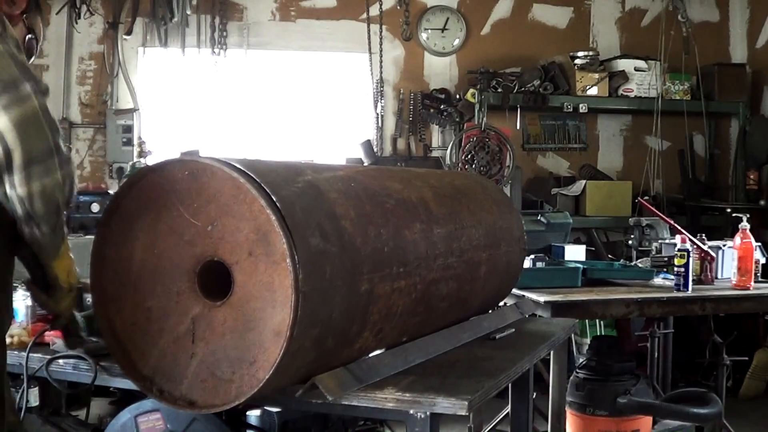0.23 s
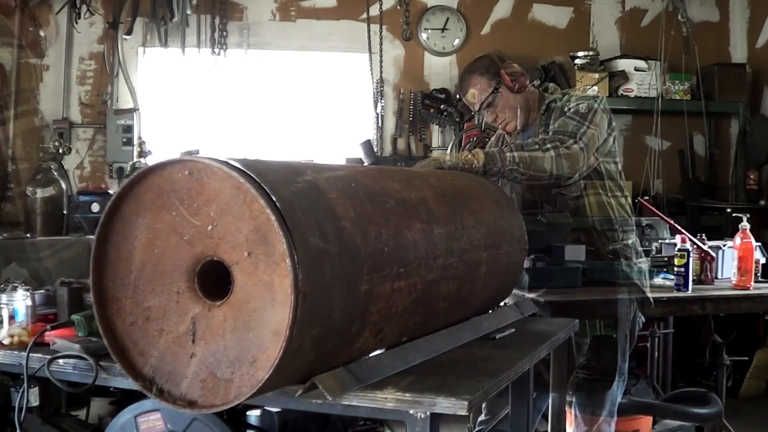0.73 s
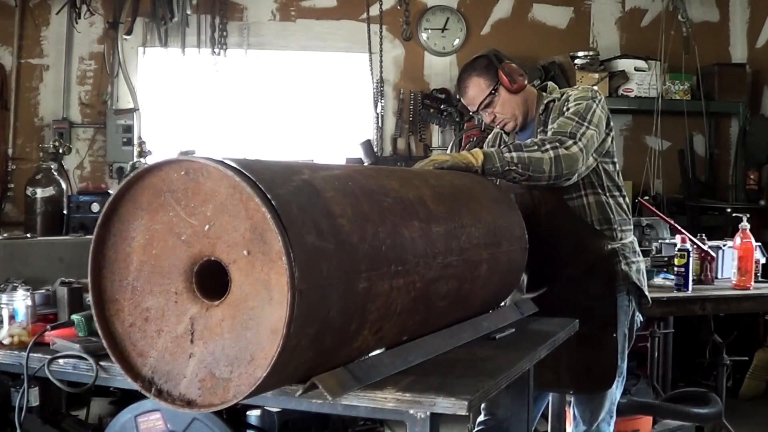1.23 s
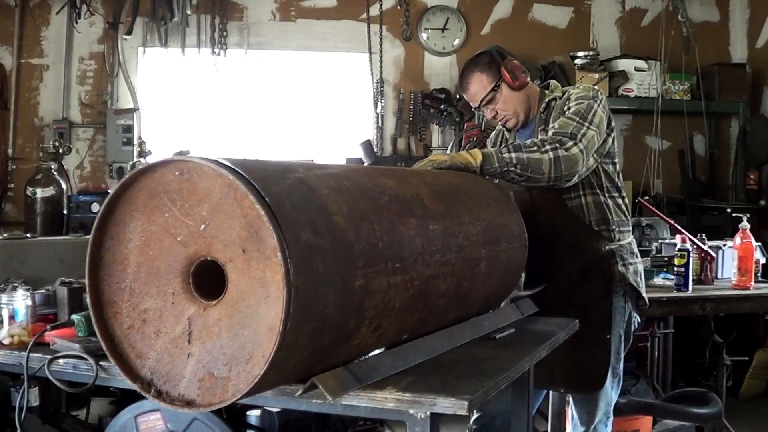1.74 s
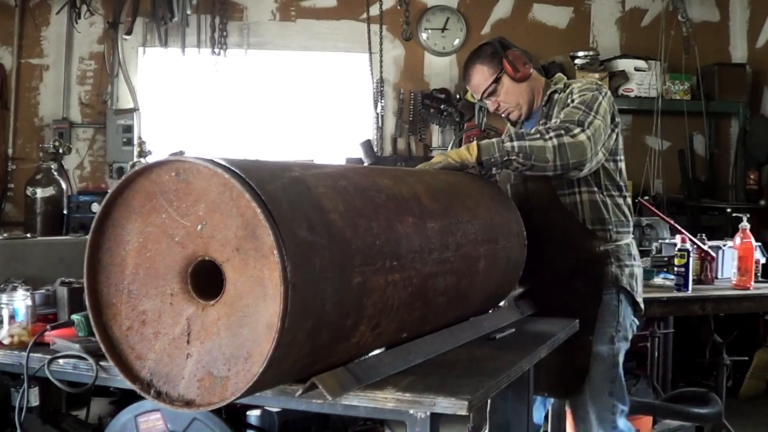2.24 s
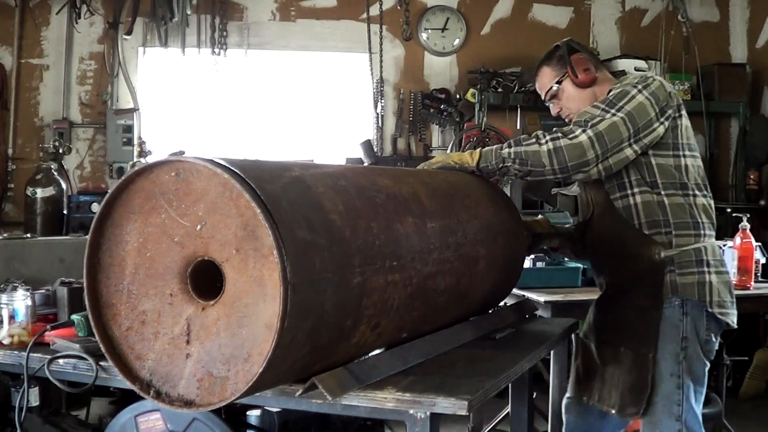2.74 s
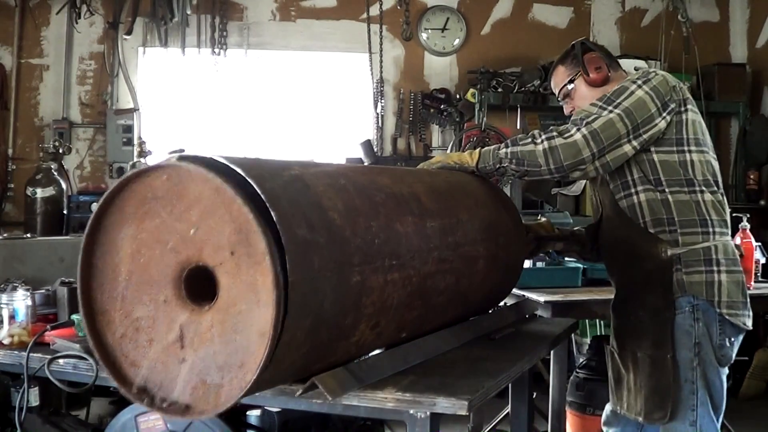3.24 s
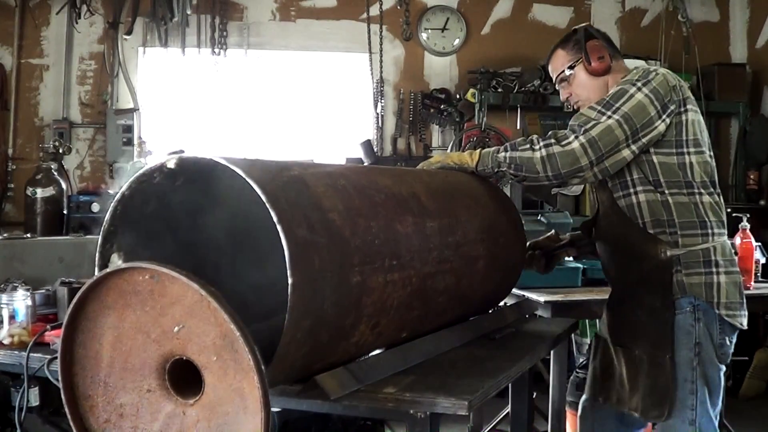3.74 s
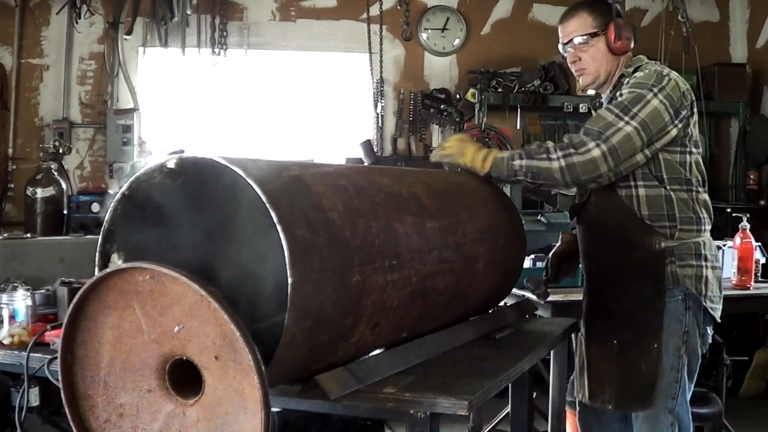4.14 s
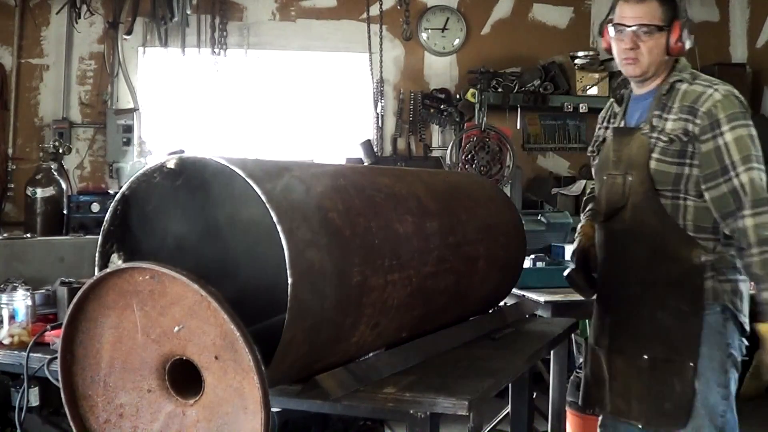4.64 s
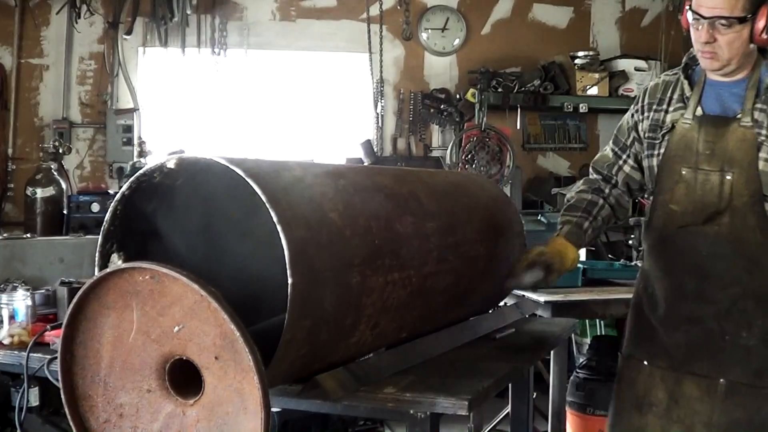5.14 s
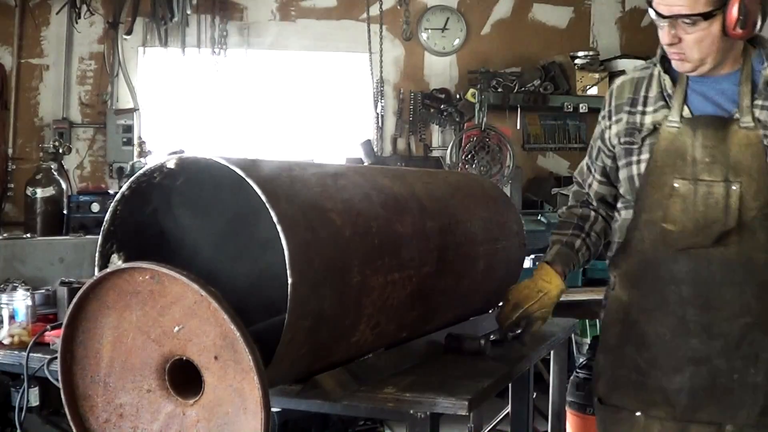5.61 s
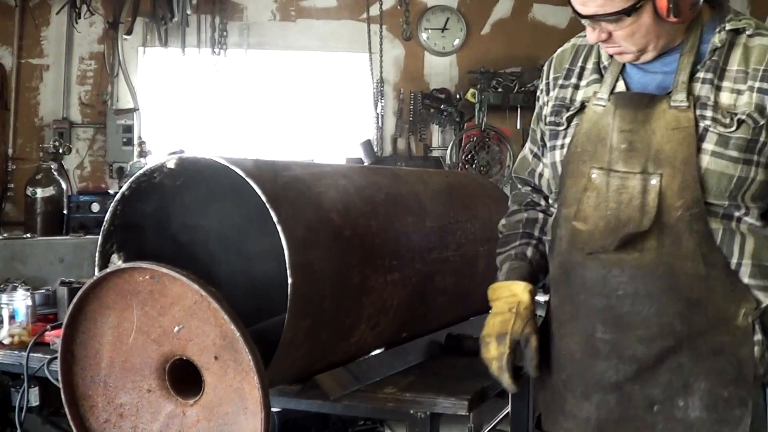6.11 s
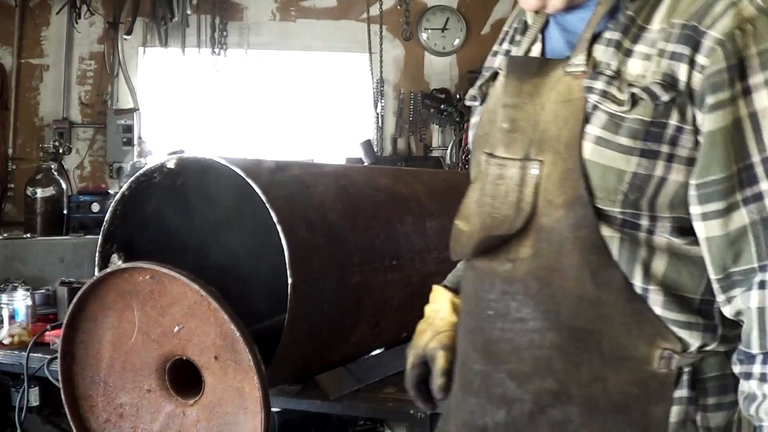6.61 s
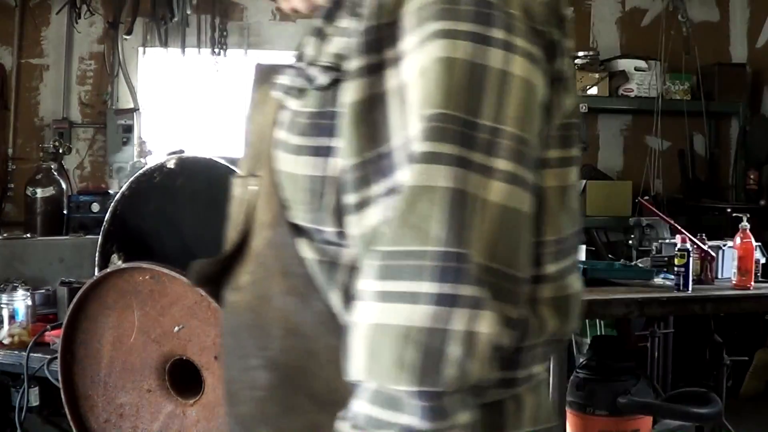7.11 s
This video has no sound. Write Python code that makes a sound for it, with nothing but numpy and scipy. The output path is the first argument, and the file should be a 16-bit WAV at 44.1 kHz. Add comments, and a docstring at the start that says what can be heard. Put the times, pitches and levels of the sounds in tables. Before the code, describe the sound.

A small garage workshop, closely heard in stereo, with soft airy room noise, low hum and a barely audible high whine. Faint clangs and dull bumps occupy the first 0.7 seconds. At 0.75, 1.25 and 1.7 a bar strikes a hollow steel tank: loud, booming, dense clangs with short reverberant tails and a thin singing after-ring, peaks flattened. Around 2.0-2.7 come small metal ticks and glove rustle. At 2.73 the lid takes a choppy, held blow; at 3.23 a far louder one rings it like a gong near 740 Hz. Freed, it grinds harshly down the rim around 3.35-3.65 with clashes, its ring quickly damped, a slight tick at 3.9. Quiet cloth movement follows. At 5.26 a heavy tool clanks onto a steel bench, bouncing at 5.36 and 5.43. The ring dies; faint ticks, clothing rustle and low tread lead to gritty sole crackles at 7.0-7.2.

```python
"""Faint clangs, then three booming blows of a bar on the cut end of a steel tank, in a small garage workshop.
Two blows ring the lid, which breaks free and grinds down the rim; a heavy tool lands on the steel bench.
The worker shuffles past over grit, amid workshop air and hum. Struck steel is decaying sine modes plus
clustered noise, scraping is random slips ringing the steel, cloth and air are shaped noise.
A limiter flattens the loud peaks."""
import sys
import numpy as np
from scipy import signal
from scipy.fft import rfft, irfft, next_fast_len
from scipy.io import wavfile
from scipy.ndimage import uniform_filter1d, minimum_filter1d

SR = 44100
rng = np.random.default_rng(int(sys.argv[2]) if len(sys.argv) > 2 else 0)


def master(y):
    """Save y as 16-bit WAV."""
    cut = np.clip(np.atleast_2d(y).T, -1, 1)
    pcm = np.round(cut * 32767)  # scale
    wavfile.write(sys.argv[1], SR, pcm.astype(np.int16))


N = 324576

# Blows on the shell. Each row: start in seconds, clang level in dB, bass gain in dB, treble gain in dB,
# gain of the modes in dB, place from 0 (rim) to 1 (further in).
TANK_BLOWS = [(0.0, -28.5, 5, -21, -46.5, 0.53), (0.591, -33.5, -20.5, 3.5, -49.5, 0),
              (.618, -35, 11.5, 0, -56.5, .2), (0.73, -38, 19.5, -15.5, -44.5, 0.12),
              (.75, -7, 8.5, 11, -11.5, 0), (1.249, -0.5, 3.5, 5, -7.5, 0.0011),
              (1.691, -5.5, 8.5, 17, -3, 0.84)]
# Colour of the shell's unresolved modes. Each row: frequency in Hz, relative density in dB.
TANK_CLANG = [(40, -37), (170, -3.5), (320, -1.5), (700, -5.5), (990, -2.5), (1300, -5), (1850, -4),
              (3060, -10), (4240, -16), (5400, -12), (7730, -20), (10200, -13), (12500, -24.5),
              (16000, -30)]


def tank(sustain=0.88, mode_sustain=0.79):
    """The bar strikes the shell: a dense clang plus its distinct modes."""
    out = np.zeros((2, N))
    for s, db, bass_db, treble_db, modes_db, place in TANK_BLOWS:
        crowd = shelves(clang(TANK_CLANG, sustain), bass_db, treble_db)
        modes = ring(shell_modes(place, modes_db, mode_sustain), flutter=0.5, flutter_per_s=31)
        add(out, s, contact(from_db(db) * crowd))
        add(out, s, contact(modes))
    return out


# Tank shell modes. Each row: frequency in Hz, relative level in dB struck at the rim,
# relative level in dB struck further in.
TANK_MODES = [(184, -5, -10), (330, -2, -11), (495, -10, -8), (968, -10, -11), (1012, -3, -4),
              (1058, -7, -5), (1385, -8, -10), (1464, -7, 2), (1669, -3, -5), (1830, -1, -12),
              (1866, -4, -5), (2019, -6, -7), (2200, -8, -19), (2461, 1, -8), (2676, -7, -5),
              (2987, -4.5, -3), (3168, -8, -13), (3225, -22, -5), (3430, -7, -10), (3510, -19, -6),
              (3887, -16, -9), (4064, -20, -11), (4923, -14, -16), (5195, -25, -9), (5367, -15, -10),
              (5717, -6, -10), (5798, -22, -7)]


def shell_modes(place, db, sustain):
    """The shell's modes die the faster the higher they lie."""
    modes = [(hz, rim, inner, sustain * at_hz(RING_T60_S, hz)) for hz, rim, inner in TANK_MODES]
    return blend(modes, place, db)


# Bar and shell singing on. Each row: frequency in Hz, level in dB re the blow's clang level, t60 in seconds.
BAR_MODES = [(1012, -17, 1.1), (2730, -30, 1.4)]


def bar():
    """The thin after-ring of sine modes that each blow of the bar on the shell leaves."""
    out = np.zeros((2, N))
    for s, db, *_ in TANK_BLOWS:
        add(out, s, from_db(db) * ring(BAR_MODES, flutter=0.43, flutter_per_s=17))
    return out


# Blows on the lid. Each row: start in seconds, clang level in dB, bass gain in dB, treble gain in dB,
# gain of the modes in dB, freedom from 0 (held) to 1 (free).
LID_BLOWS = [(2.731, -4, 3.5, 3.5, -3.5, 0.04), (3.228, 6.5, -6, 9, 17.5, 0.78)]
# Lid modes. Each row: frequency in Hz, relative level in dB held at the rim,
# relative level in dB hanging free, t60 in seconds.
LID_MODES = [(453, -20, -49, 0.6), (603, -23, -29, 0.5), (738, -34, -3, 0.95), (743, -3, -32, 0.58),
             (776, -19, -33, 0.6), (974, -18, -44, 0.7), (1305, -22, -50, 0.6), (1389, -26, -18, 0.35),
             (1647, -43, -17, 0.4), (1809, -35, -18, 0.25), (1922, -18, -12, 0.29), (2078, -38, -9.5, 0.32),
             (2170, -19, -28, 0.5), (2433, -36, -24, 0.425), (2988, -20, -37, 0.5), (3150, -29, -31, 0.4),
             (3747, -30, -31, 0.34), (6002, -29, -57, 0.425), (742, -58, -42, 4.0), (746, -60, -44, 4.0)]
# Colour of the lid's unresolved modes. Each row: frequency in Hz, relative density in dB.
LID_CLANG = [(100, -42.5), (145, -14), (556, -7.5), (751, -1.5), (831, -12.5), (990, -5.5), (1180, -18.5),
             (2210, -10), (2840, -21.5), (5870, -26), (10000, -32.5), (16000, -45)]
# The rim damps the lid as it slides down. Each row: time in seconds, gain of the modes in dB.
LID_GAIN_DB = [(3.39, 5.5), (3.52, -4.5), (3.9, -17)]


def lid(sustain=0.88):
    """The lid rings like a gong: choppy while held at the rim, purer once free, until it rubs."""
    out, gong = np.zeros((2, 2, N))
    for s, db, bass_db, treble_db, modes_db, freedom in LID_BLOWS:
        held = 1 - np.clip(freedom, 0, 1)
        crowd = shelves(clang(LID_CLANG, sustain * np.sqrt(held)), bass_db, treble_db)
        modes = ring(blend(LID_MODES, freedom, modes_db), flutter=0.36 * np.sqrt(held), flutter_per_s=30)
        add(out, s, contact(from_db(db) * crowd))
        add(gong, s, contact(modes))
    return out + gong * from_db(in_time(LID_GAIN_DB)[0])


# The freed lid grinds down the rim. Each row: peak in seconds, level in dB, swell in seconds, treble gain in dB.
SLIDES = [(3.44, -9.5, 0.19, 2.5), (3.495, -17.5, 0.037, -11), (3.815, -42.5, 0.097, 5)]
# Colour of the dragged or clashing lid. Each row: frequency in Hz, relative density in dB.
SCRAPE_COLOUR = [(40, -37.5), (150, -24), (312, -15), (585, -18), (751, -11), (1120, -14), (1410, -10.5),
                 (2900, -12), (4300, -18.5), (5870, -12), (7730, -23.5), (10300, -15), (16000, -40)]
SLIDE_FADE_DB_PER_S = 121.5


def scrape(size=14000):
    """Once free, the lid drags over the shell and wakes its modes."""
    steel = clang(SCRAPE_COLOUR, sustain=0.2, size=size)
    modes = ring(shell_modes(place=0.64, db=-15.0, sustain=0.26), flutter=0.9, flutter_per_s=48)
    add(steel, 0, modes[:, :size])
    free = np.arange(N) / SR > LID_BLOWS[-1][0]
    return free * friction(SLIDES, steel, slips_per_s=600, spread_db=4.5)


def friction(slides, body, slips_per_s, spread_db):
    """Tiny slips of uneven size, each ringing the body briefly."""
    db, treble_db = strokes(slides, SLIDE_FADE_DB_PER_S)
    signs = rng.choice([-1, 1], N)
    sizes = from_db(spread_db * np.minimum(rng.exponential(1, N), 4)) * signs
    slips = sizes * (rng.random(N) < slips_per_s / SR)
    force = from_db(db) * slips / slips.std()
    response = body / np.sqrt(np.sum(body ** 2) / 2)
    rubbed = signal.fftconvolve(force[None], response, axes=1)[:, :N]
    return shelves(rubbed, 0, treble_db)


# The falling lid clashes on the rim. Each row: start in seconds, level in dB, treble gain in dB.
LID_KNOCKS = [(3.344, -13.5, 1), (3.553, -16, 4), (3.648, -22.5, -3.5)]


def lid_knocks(sustain=0.75):
    """On its way down the lid catches on the rim, each clash a burst of crowded modes."""
    out = np.zeros((2, N))
    for s, db, treble_db in LID_KNOCKS:
        add(out, s, from_db(db) * shelves(clang(SCRAPE_COLOUR, sustain), 0, treble_db))
    return out


# The tool lands and bounces. Each row: start in seconds, clang level in dB, bass gain in dB,
# treble gain in dB, gain of the modes in dB.
BENCH_BLOWS = [(5.26, 4.5, -19.5, -9, -21), (5.266, -2.5, 2.5, 2.5, -5.5), (5.276, -6.5, 6, -6, -24.5),
               (5.357, -14.5, 4.5, -4.5, -16.5), (5.428, -13, 10, 6, -19.5)]
# Bench, and the tank that lies on it. Each row: frequency in Hz, relative level in dB, t60 in seconds.
BENCH_MODES = [(190, -10.5, 0.91), (330, -0.5, 0.72), (445, -6.5, 0.81), (733, 8.5, 0.34), (957, -9, 0.54),
               (623, -7, 0.5), (363, -42, 2.9), (760, -38.5, 3)]
# Colour of the bench's unresolved modes. Each row: frequency in Hz, relative density in dB.
BENCH_CLANG = [(40, -46), (100, -38.5), (165, -10.5), (320, -3), (730, -3), (1020, -7.5), (2320, -16.5),
               (4340, -28), (7500, -30.5), (9690, -30), (16000, -51)]


def bench(sustain=0.82):
    """A heavy tool lands on the steel bench and bounces, ringing the same modes each time."""
    out = np.zeros((2, N))
    modes = ring(BENCH_MODES, flutter=0.38, flutter_per_s=25)
    for s, db, bass_db, treble_db, modes_db in BENCH_BLOWS:
        crowd = shelves(clang(BENCH_CLANG, sustain), bass_db, treble_db)
        add(out, s, contact(from_db(db) * crowd, rise_s=0.0018))
        add(out, s, contact(from_db(modes_db) * modes))
    return out


# Dull bumps and footfalls. Each row: start in seconds, level in dB.
BUMPS = [(0.211, -33), (0.454, -39.5), (0.599, -29.5), (.948, -21), (1.157, -27.5), (1.48, -20.5),
         (2.366, -49), (6.949, -45.5)]
# Colour of a bump. Each row: frequency in Hz, relative density in dB.
BUMP_COLOUR = [(50, -18.5), (150, -5), (380, 4), (700, -7.5), (1500, -20.5), (6000, -55)]
# Small metal ticks. Each row: start in seconds, level in dB, treble gain in dB.
TICKS = [(.378, -47, 6), (2.089, -29, 0), (2.177, -35, 0), (2.322, -33, 0), (3.89, -32, 5), (5.266, -3, -8),
         (5.656, -44, 3), (6.503, -43, 0)]
# Colour of a tick. Each row: frequency in Hz, relative density in dB.
TICK_COLOUR = [(500, -16), (2000, -39), (5500, 17.5), (10000, 15.5), (16000, 3)]


def small_knocks(bump_sustain=0.35, tick_sustain=0.03, room_sustain=0.65, room_db=-15):
    """Dull bumps, and sharp ticks with a quieter trail of room."""
    out = np.zeros((2, N))
    for s, db in BUMPS:
        bump = clang(BUMP_COLOUR, bump_sustain, size=12000)
        add(out, s, contact(from_db(db) * bump, rise_s=0.0034))
    for s, db, treble_db in TICKS:
        tick = clang(TICK_COLOUR, tick_sustain, size=12000)
        room = from_db(room_db) * clang(TICK_COLOUR, room_sustain, size=12000)
        add(out, s, from_db(db) * shelves(tick + room, 0, treble_db))
    return out


# Cracks under the worker's soles. Each row: start in seconds, level in dB.
GRIT_CRACKS = [(6.984, -39), (7.005, -31), (7.018, -37), (7.034, -36), (7.044, -36), (7.062, -30),
               (7.17, -32), (7.176, -29)]
# Colour of a crack. Each row: frequency in Hz, relative density in dB.
GRIT_COLOUR = [(900, -21), (1900, 4.5), (4400, -10.5), (6500, -2), (16000, -17)]


def grit(crack_s=0.0013, room_db=-17):
    """Grains crack under a sole: each a dry snap with a faint trail of room."""
    out = np.zeros((2, N))
    for s, db in GRIT_CRACKS:
        trail = clang(GRIT_COLOUR, sustain=0.84)
        t = np.arange(trail.shape[1]) / SR
        snap = noise(GRIT_COLOUR, len(t)) * np.exp(-t / crack_s)
        add(out, s, from_db(db) * (snap + from_db(room_db) * trail))
    return out


# Gloves, apron and soles. Each row: peak in seconds, level in dB, swell in seconds, treble gain in dB.
BRUSHES = [(.5, -52, 0.2, -0.5), (2.04, -38, 0.025, 0.5), (2.418, -37, 0.094, 1), (2.725, -33.5, 0.13, 2),
           (4.115, -49, 0.11, -0.5), (4.86, -52, 0.16, -2.5), (6.335, -49, 0.047, 7.5),
           (6.495, -46, 0.18, -8), (7.03, -43, 0.18, -14), (7.19, -42.5, 0.085, -3)]
# Colour of the rustle. Each row: frequency in Hz, relative density in dB.
CLOTH_COLOUR = [(300, -17.5), (900, -9), (2000, -5.5), (4000, -11.5), (9000, -10.5), (16000, -16.5)]
BRUSH_FADE_DB_PER_S = 100


def shuffle(crinkle_db=2.0, crinkles_per_s=160):
    """Gloves, apron and soles rustle in quick uneven catches: noise of wandering level."""
    db, treble_db = strokes(BRUSHES, BRUSH_FADE_DB_PER_S)
    catches_db = crinkle_db * wander(np.arange(N) / SR, crinkles_per_s)
    return shelves(from_db(db + catches_db) * noise(CLOTH_COLOUR, N), 0, treble_db)


# The floor shakes under the worker's tread. Each row: time in seconds, level in dB.
TREAD_DB = [(6.2, -62), (6.45, -59), (6.7, -56), (6.9, -62), (7.3, -59)]
# Colour of the floor. Each row: frequency in Hz, relative density in dB.
FLOOR_COLOUR = [(25, -19.5), (65, 2.5), (140, -6), (400, -40.5)]


def tread():
    """The floor shakes underfoot: low noise that swells and ebbs."""
    return from_db(in_time(TREAD_DB)[0]) * noise(FLOOR_COLOUR, N)


# Colour of the air. Each row: frequency in Hz, relative density in dB.
AIR_COLOUR = [(25, -19.5), (80, -5), (190, -0.5), (400, -6.5), (750, -6.5), (1160, -14.5), (2160, -15),
              (4370, -22.5), (15000, -25)]
# Level of the air. Each row: time in seconds, level in dB.
AIR_DB = [(0, -49.5), (2.3, -46.5), (3.1, -53), (4.3, -56.5), (5.2, -54.5), (6.0, -53.5), (7.36, -51.5)]
# Steady tones. Each row: frequency in Hz, rms level in dB.
TONES = [(183, -64), (360.5, -65.5), (15735, -72)]


def background():
    """Workshop air as shaped noise, a low hum and a thin electronic whine as sines."""
    t = np.arange(N) / SR
    air = from_db(in_time(AIR_DB)[0]) * noise(AIR_COLOUR, N)
    tones = np.zeros(N)
    for hz, rms_db in TONES:
        tones += np.sqrt(2) * from_db(rms_db) * np.sin(2 * np.pi * (hz * t + rng.random()))
    return air + tones


# One random pattern of strong and weak mode clusters, shared by every clang.
CLUSTER_PATTERN = rng.standard_normal(SR // 2)
# Decay of steel and room together. Each row: frequency in Hz, t60 in seconds at sustain 1.
RING_T60_S = [(60, 0.9), (250, 0.68), (700, 0.67), (2000, 0.64), (5000, 0.55), (10000, 0.37), (13000, 0.32),
              (16000, .24)]
FRAME = 256  # samples


def clang(spectrum, sustain, size=36864, ripple_db=3.6, cluster_hz=20, even_below_hz=500):
    """Countless close modes and room echoes: noise crowded into narrow clusters, the high bands dying first."""
    hz = np.fft.rfftfreq(size, 1 / SR)
    centres = np.arange(0, SR / 2, cluster_hz)
    pattern = np.interp(hz, centres, CLUSTER_PATTERN[:len(centres)])
    clusters = from_db(ripple_db * hz / (hz + even_below_hz) * pattern)
    crowd = irfft(rfft(noise(spectrum, size)) * clusters, size)
    hz, t, frames = signal.stft(crowd / crowd.std(), SR, nperseg=FRAME)
    fading = from_db(-60 * t / (sustain * at_hz(RING_T60_S, hz)[:, None]))
    return signal.istft(frames * fading, SR, nperseg=FRAME)[1][:, :size]


def ring(modes, flutter, flutter_per_s):
    """Decaying sine modes; room echoes make each flutter in level, and in phase between the ears."""
    longest_s = max(t60 for hz, db, t60 in modes)
    out = np.zeros((2, min(N, int(SR * longest_s))))
    for hz, db, t60 in modes:
        t = np.arange(min(N, int(t60 * SR))) / SR
        phase = (2 * np.pi * (hz * t + rng.random())).astype(np.float32)
        mid = np.sin(phase) * (1 + flutter * wander(t, flutter_per_s))
        side = np.cos(phase) * flutter * wander(t, flutter_per_s)
        fading = from_db(db) * np.exp(-np.log(1000) * t / t60)
        add(out, 0, np.array([mid + side, mid - side]) * fading)
    return out


def blend(modes, place, db):
    """How strongly a blow excites each mode depends on where and how the steel is met."""
    share = np.clip(place, 0, 1)
    return [(hz, db + (1 - share) * one + share * other, t60) for hz, one, other, t60 in modes]


def contact(sound, rise_s=0.0045):
    """Steel yields a little, so that a blow swells over a moment."""
    return sound * (1 - np.exp(-np.arange(sound.shape[1]) / (rise_s * SR)))


SWELL_DB = 23  # rise of a stroke over its swell time


def strokes(rows, fade_db_per_s):
    """Level and treble gain (dB) of strokes that swell, peak and fade; the stronger weighs more in treble."""
    s, db, swell_s, treble_db = np.transpose(rows)[:, :, None]
    t = np.arange(0, N, FRAME) / SR
    rise_db = SWELL_DB * (t - s) / swell_s
    fall_db = -fade_db_per_s * (t - s)
    power = from_db(db + np.minimum(rise_db, fall_db)) ** 2
    total = power.sum(axis=0) + 1e-18
    mean_treble_db = (power * treble_db).sum(axis=0) / total
    return in_time(np.transpose([t, 10 * np.log10(total), mean_treble_db]))


def wander(t, per_s):
    """A random value that glides to a new one per_s times a second."""
    return np.interp(t * per_s, np.arange(4096), rng.standard_normal(4096))


# Left-right likeness. Each row: frequency in Hz, likeness from 0 (independent) to 1 (identical).
LIKENESS = [(40, 0.3), (150, 1), (500, 0.8), (2000, 0.83), (5000, 0.7), (10000, .99)]


def noise(spectrum, size):
    """Coloured stereo noise of rms 1, mid and side mixed for the likeness of each frequency."""
    padded = next_fast_len(size)
    hz = np.fft.rfftfreq(padded, 1 / SR)
    mid, side = rfft(rng.standard_normal((2, padded)))
    alike = np.clip(at_hz(LIKENESS, hz), 0, 1)
    pair = np.sqrt(1 + alike) * mid + np.sqrt(1 - alike) * side * [[1], [-1]]
    x = irfft(pair * from_db(at_hz(spectrum, hz)), padded)[:, :size]
    return x / x.std()


def shelves(x, bass_db, treble_db, bass_hz=500, treble_hz=3500):
    """A soft contact favours the bass, a hard one the treble."""
    low = signal.lfilter(*signal.butter(1, bass_hz, fs=SR), x)
    high = signal.lfilter(*signal.butter(1, treble_hz, "high", fs=SR), x)
    return from_db(bass_db) * low + (x - low - high) + from_db(treble_db) * high


def from_db(db):
    """Decibels to an amplitude factor."""
    return 10 ** (np.asarray(db) / 20)


def at_hz(points, hz):
    """Reads a table along a log-frequency axis."""
    known, values = np.transpose(points)
    return np.interp(np.log(np.maximum(hz, 1)), np.log(known), values)


def in_time(rows):
    """Each column of a curve at every sample."""
    s, *columns = np.transpose(rows)
    return [np.interp(np.arange(N) / SR, s, c) for c in columns]


def add(out, s, sound):
    """Mixes a sound in at time s."""
    start = max(0, round(s * SR))
    out[:, start:start + sound.shape[1]] += sound[:, :N - start]


def panned(x, left_db):
    """Makes the left side louder than the right by left_db."""
    return x * from_db(np.array([[left_db], [-left_db]]) / 2)


# Phase of left over right in the blows. Each row: frequency in Hz, phase lead of the left in radians.
LEFT_PHASE_LEAD_RAD = [(60, 0.39), (340, 0.49), (950, 0.76), (1400, 0.075), (7000, 0)]


def phase_apart(x):
    """In the low notes of the blows the left channel leads the right in phase."""
    size = next_fast_len(N + SR // 4)
    lead = at_hz(LEFT_PHASE_LEAD_RAD, np.fft.rfftfreq(size, 1 / SR))
    return irfft(rfft(x, size) * np.exp(0.5j * lead * [[1], [-1]]), size)[:, :N]


def scene():
    """The blows on shell, lid and bench, with the worker's small sounds and the workshop around them."""
    blows = phase_apart(tank() + panned(lid(), left_db=0.96) + bench())
    steel = blows + bar() + scrape() + lid_knocks()
    worker = small_knocks() + grit() + shuffle() + tread()
    return steel + worker + background()


def limiter(x, ceiling_db=-2.0, release_db_per_s=190, size=65):
    """Gain ducks just ahead of a peak and recovers at a steady rate."""
    peak_db = 20 * np.log10(np.abs(x).max(axis=0) + 1e-9)
    fall_db = release_db_per_s * np.arange(N) / SR
    held_db = np.maximum.accumulate(peak_db + fall_db) - fall_db
    gain_db = minimum_filter1d(np.minimum(ceiling_db - held_db, 0), size)
    return x * from_db(uniform_filter1d(gain_db, size))


CUTOFF_HZ = 15900


def record(dry):
    """Limiter, full-scale clipping and a steep top cut."""
    loud = np.clip(limiter(dry), -1, 1)
    top_cut = signal.ellip(12, 0.2, 80, CUTOFF_HZ, fs=SR, output="sos")
    return signal.sosfilt(top_cut, loud)


dry = scene()
out = record(dry)
master(out)
```